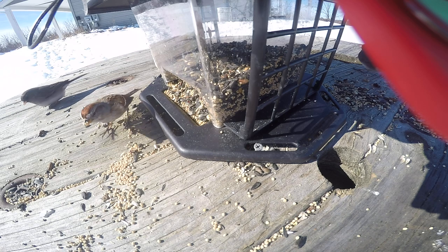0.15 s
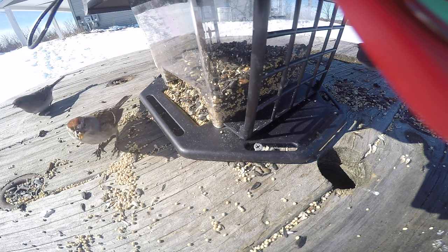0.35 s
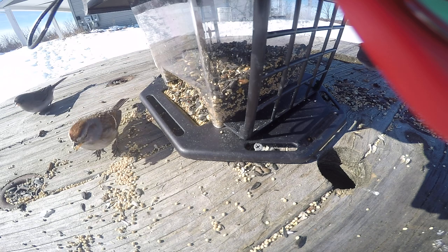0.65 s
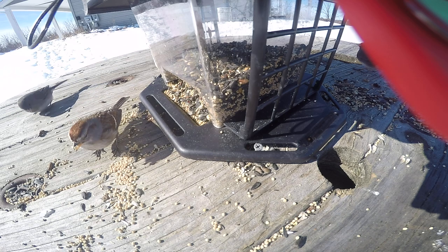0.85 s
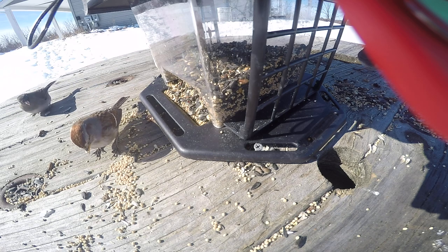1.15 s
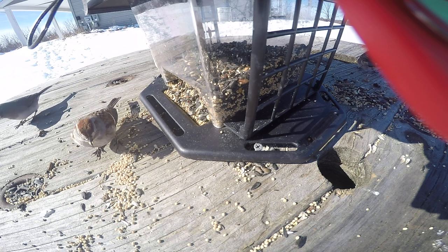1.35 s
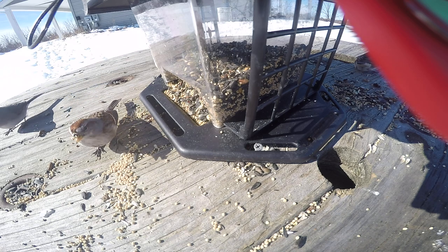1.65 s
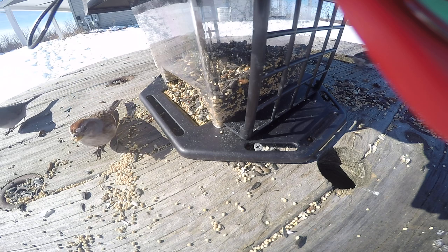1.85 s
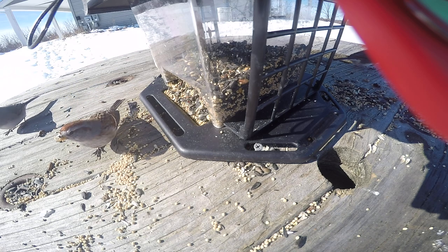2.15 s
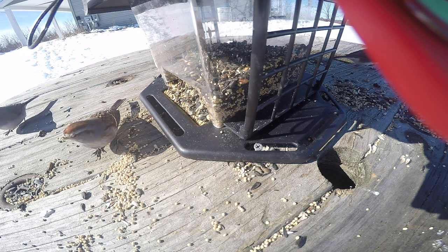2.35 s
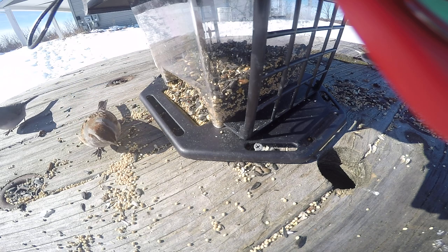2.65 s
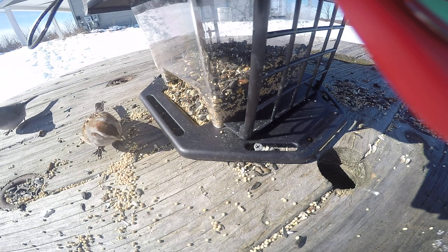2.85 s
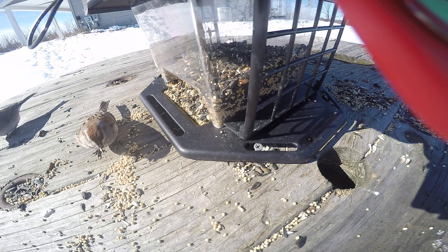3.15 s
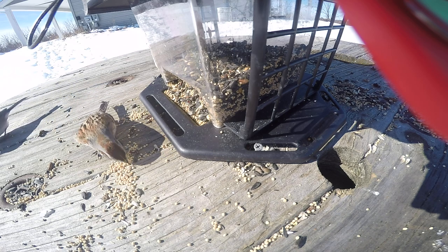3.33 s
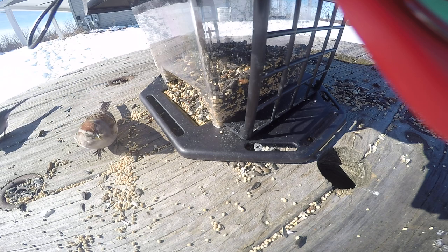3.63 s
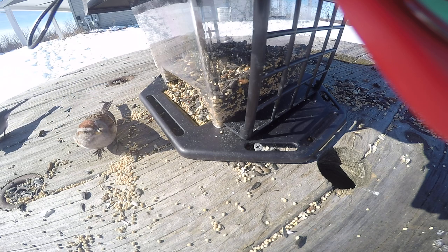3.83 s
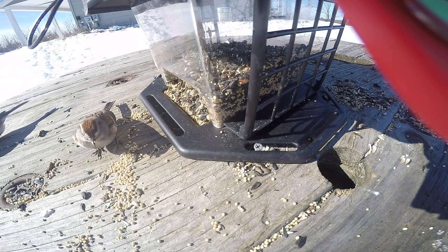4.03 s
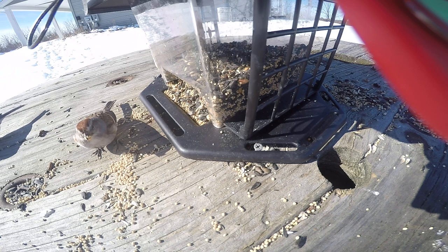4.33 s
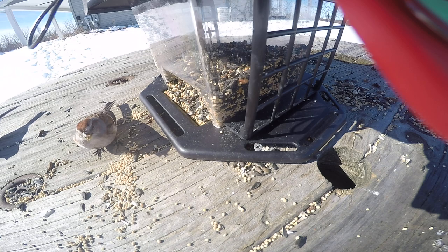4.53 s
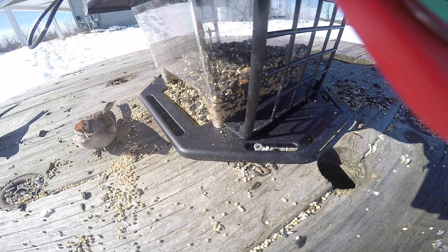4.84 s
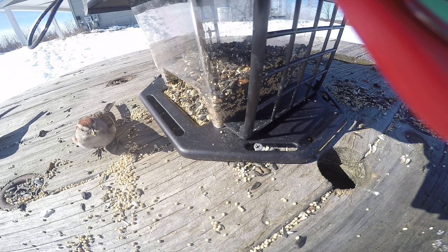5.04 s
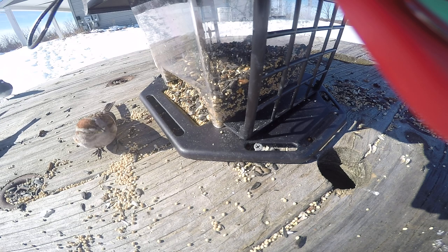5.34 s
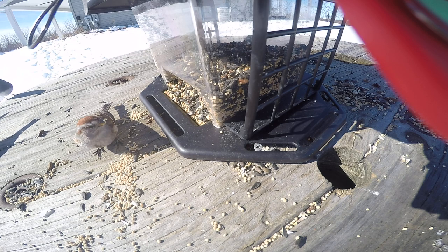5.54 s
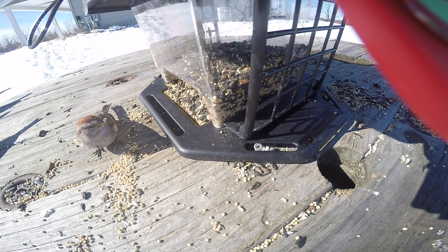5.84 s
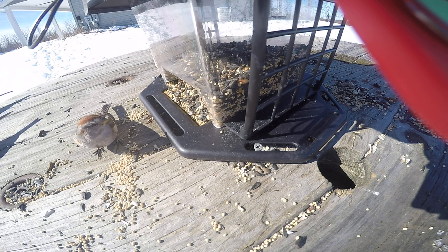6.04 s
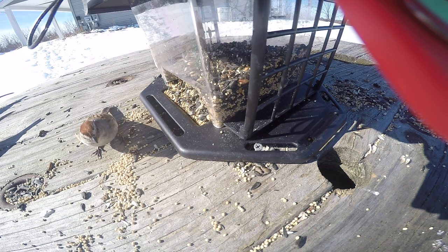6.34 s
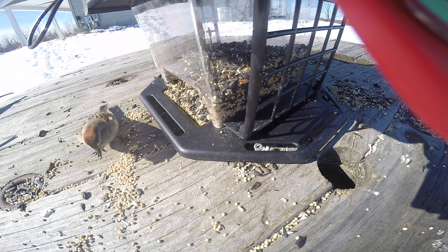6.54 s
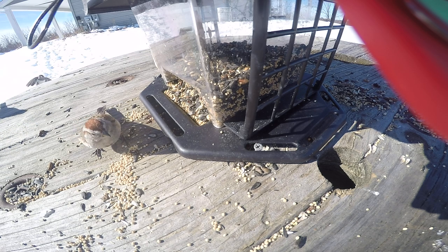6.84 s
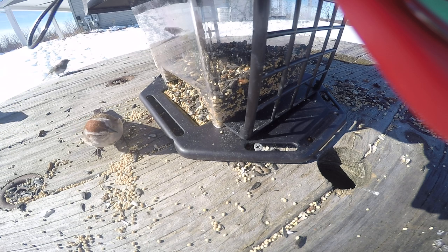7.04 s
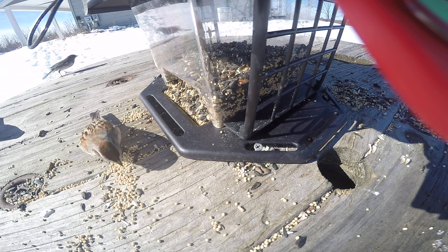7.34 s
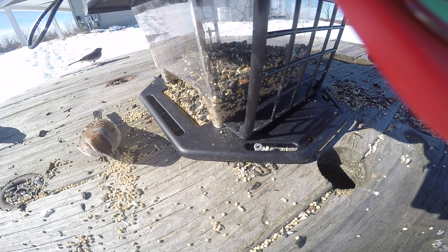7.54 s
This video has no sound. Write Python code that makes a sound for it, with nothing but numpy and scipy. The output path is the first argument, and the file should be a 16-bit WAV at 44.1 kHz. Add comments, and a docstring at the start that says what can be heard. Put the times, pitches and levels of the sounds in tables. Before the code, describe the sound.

Small birds feed on a wooden table outdoors, close to the microphone. Over a faint hiss and light wind rumble, two buzzy squabbling chirps break out, followed by a quick run of sharp, falling calls. Seed husks tick and claws scuff, then beaks and feet knock lightly on the boards. A second, softer run of calls comes at the end, along with a brief gust of wind.

```python
"""Small birds feeding on a wooden table in a snowy yard, one microphone close by.
Light wind rumbles over the recorder's hiss and faint whine; feet scuff and seed husks tick.
At 1.6 s come two buzzy squabbling chirps, then a run of sharp falling 'tew' and 'tik' calls that
echo off table and feeder. From 4.3 s beaks and feet knock on the boards; a second run of calls ends it."""
import sys
import numpy as np
from scipy import signal
from scipy.fft import rfft, irfft
from scipy.io import wavfile
from scipy.ndimage import uniform_filter1d

SR = 44100
rng = np.random.default_rng(int(sys.argv[2]) if len(sys.argv) > 2 else 0)


def generate_wav(sig):
    """Save sig (samples, or channels by samples) to the path in sys.argv[1] as 16-bit PCM at SR."""
    pcm = np.round(np.clip(np.atleast_2d(sig).T, -1, 1) * 32767).astype(np.int16)
    wavfile.write(sys.argv[1], SR, pcm)


N = 338688
TOP_HZ = 15350  # upper edge of the recorder's band


def undb(db):
    """Decibels to gain."""
    return 10 ** (np.asarray(db) / 20)


def unit(x):
    """Scale to rms 1."""
    return x / np.sqrt(np.mean(x ** 2) + 1e-30)


def clock(length):
    """Sample times of a short sound."""
    return np.arange(max(int(length * SR), 8)) / SR


def fade(t, t60):
    """Free decay by 60 dB in t60 seconds."""
    return np.exp(-np.log(1000) * t / t60)


def add(out, start, x):
    """Mix x into out from start seconds on."""
    i = int(np.clip(start * SR, 0, N - 1))
    out[i:i + len(x)] += x[:N - i]


def resonate(x, hz, width):
    """One steep-sided resonance, gain 1 at its centre."""
    hz = min(hz, .45 * SR)
    b, a = signal.iirpeak(hz, max(hz / width, .5), fs=SR)
    return signal.lfilter(b, a, signal.lfilter(b, a, x))


def coloured(points):
    """Noise of rms 1 with a spectrum of (Hz, dB) points."""
    hz, db = np.transpose(points)
    bins_hz = np.maximum(np.arange(N // 2 + 1) * SR / N, 1)
    gain = undb(np.interp(np.log(bins_hz), np.log(hz), db))
    return unit(irfft(rfft(rng.standard_normal(N)) * gain, N))


def waver(t, rate):
    """A random wander with a spread near 1, turning rate times a second."""
    steps = rng.standard_normal(int(t[-1] * rate) + 2)
    return np.interp(t * rate, np.arange(len(steps)), steps)


def hiss(hiss_db=-65, whine_hz=1948, whine_db=-72):
    """The recorder's steady hiss, with a thin electronic whine in it."""
    # The broad hiss. Each row: frequency in Hz, relative level in dB.
    spectrum = [(88, -26), (150, -2.5), (470, -10), (548, -10), (593, -10.5), (907, -12), (1210, -12),
                (1500, -15), (1860, -10), (1970, -8), (2170, -16), (2430, -12), (7920, -21), (13900, -26),
                (15300, -29.5)]
    # Narrow bands in the hiss. Each row: centre in Hz, width in Hz, level in dB.
    narrow_bands = [(1157, 246, -78.5), (1979, 210, -79), (9560, 290, -84), (13760, 1900, -81.5)]
    bands = sum(undb(db) * unit(resonate(rng.standard_normal(N), hz, width))
                for hz, width, db in narrow_bands)
    drift_hz = 2.5 * waver(np.arange(N) / SR, 12)
    whine = unit(np.sin(2 * np.pi * np.cumsum(whine_hz + drift_hz) / SR))
    return undb(hiss_db) * coloured(spectrum) + bands + undb(whine_db) * whine


def wind(breeze_sway_db=-61, breeze_rumble_db=-66):
    """Large eddies sway the microphone's diaphragm, small ones rumble; gusts swell over an even breeze."""
    # Spectra of the sway and the rumble. Each row: frequency in Hz, relative level in dB.
    sway = [(5, -13.5), (15, 0.5), (30, -3), (45, -3), (58, -22.5), (120, -65)]
    rumble = [(30, -29), (58, 3), (98, -3.5), (125, -11.5), (180, -19.5), (400, -42), (900, -90)]
    # Gusts. Each row: time of the peak in seconds, rise in seconds, sway in dB, rumble in dB.
    gusts = [(.45, 0.22, -54.5, -66), (1.01, 0.21, -61, -63), (1.39, 0.12, -52, -60),
             (1.81, 0.098, -53, -53), (4.488, 0.18, -50, -58.5), (6.00, 0.19, -56, -66.5),
             (6.824, .06, -42.5, -38)]
    peaks, rises, sway_db, rumble_db = np.transpose(gusts)
    t, out = np.arange(N) / SR, 0
    # linger is dying time over rise time: large eddies last longest
    for spectrum, breeze_db, gust_db, linger in ((sway, breeze_sway_db, sway_db, 2.03),
                                                 (rumble, breeze_rumble_db, rumble_db, .98)):
        power = undb(breeze_db) ** 2
        for peak, rise, db in zip(peaks, rises, gust_db):
            width = np.where(t < peak, rise, rise * linger)
            power = power + undb(db) ** 2 * np.exp(-2 * ((t - peak) / width) ** 2)
        eddies = coloured(spectrum)
        out = out + eddies * np.sqrt(power / uniform_filter1d(eddies ** 2, size=4500))
    return out


def scuffs(catch_spread_db=4.5):
    """Claws and beaks drag over wood and seed in a dense run of uneven catches."""
    # Each row: start in seconds, length in seconds, level in dB.
    drags = [(0.266, 0.053, -69), (1.488, 0.076, -65.5), (4.372, 0.022, -68), (4.408, 0.038, -59),
             (4.632, 0.039, -49.5), (4.692, 0.019, -62.5), (5.641, 0.033, -65), (5.886, 0.052, -63),
             (5.945, 0.03, -65), (6.722, 0.019, -58)]
    # Resonances of a scuff. Each row: centre in Hz, width in Hz, gain in dB.
    resonances = [(2618, 743, 2.5), (3240, 630, -2), (4490, 620, -14), (7000, 2400, -20.5)]
    out = np.zeros(N)
    for start, length, db in drags:
        n = len(clock(length))
        catches = rng.standard_normal(n) * undb(catch_spread_db * np.minimum(rng.exponential(size=n), 4))
        catches = np.pad(catches * signal.windows.tukey(n, .5), (0, n))
        scrape = sum(undb(gain_db) * resonate(catches, hz, width) for hz, width, gain_db in resonances)
        add(out, start, undb(db) * unit(scrape) / np.sqrt(2))
    return out


def nibbles(count=10, slot_s=.58, db=-53.5, centre_hz=4300, width_hz=2300):
    """Faint nibbling: rows for ticks(), one at a chance moment in each slot."""
    return [((k + when) * slot_s, db, centre_hz * 2 ** (pitch - .5), width_hz)
            for k, (when, pitch) in enumerate(rng.random((count, 2)))]


def ticks(ring_cycles=46, snap_db=-15.5, snap_hz=7400, snap_width_hz=5600):
    """A husk snaps brightly and rings briefly; small, high ones die soonest."""
    # Seeds cracked or flicked. Each row: start in seconds, ring's peak in dB, pitch in Hz, width in Hz.
    husks = [(1.787, -44, 1830, 900), (1.788, -50, 8600, 2500), (1.8166, -36, 1730, 1800),
             (1.828, -44.5, 3600, 3000), (2.092, -45, 2900, 3900), (3.5033, -38, 4600, 3120),
             (3.583, -53, 10150, 1000), (4.228, -47, 2790, 250), (4.572, -46, 3770, 3000),
             (5.804, -47.5, 5950, 12000), (5.991, -47, 9000, 7000), (6.779, -48, 2402, 3000),
             (7.306, -45.5, 5160, 1500)]
    out, t = np.zeros(N), clock(.05)
    for start, db, hz, width in husks + nibbles():
        burst = rng.standard_normal(len(t)) * fade(t, ring_cycles / hz)
        ring = resonate(burst, hz, width)
        snap = resonate(burst, snap_hz, snap_width_hz)
        tick = ring / np.abs(ring).max() + undb(snap_db) * snap / np.abs(snap).max()
        add(out, start, undb(db) * tick)
    return out


def chirp(gesture, gain_db, buzz_hz, swing=.025, depth=.75, octave_db=-15, rasp=.055, air_db=-14):
    """A gliding whistle, chopped and shaken by a fast flutter of the membranes, with a rasp of air."""
    # The air in a chirp. Each row: frequency in Hz, relative level in dB.
    air_spectrum = [(1200, -47), (2300, 4), (5500, 1), (7800, 2), (8900, -21), (10500, -6), (15000, -27)]
    times, *columns = np.transpose(gesture)
    t = clock(times[-1] - times[0])
    hz, db, buzz = (np.interp(times[0] + t, times, column) for column in columns)
    flutter_hz = buzz_hz * (1 + .06 * waver(t, 300))
    flutter = np.sin(2 * np.pi * np.cumsum(flutter_hz) / SR)
    shake = buzz * (swing * flutter + rasp * waver(t, 2979))
    phase = 2 * np.pi * np.cumsum(hz * (1 + shake)) / SR
    octave = undb(octave_db) / (1 + (hz / 4200) ** 12) * np.sin(2 * phase)  # high notes are purer
    air = undb(air_db) * np.sqrt(np.abs(buzz)) * coloured(air_spectrum)[:len(t)]
    return undb(db + gain_db) * (1 + depth * buzz * flutter) * (np.sin(phase) + octave + air)


def squabble():
    """Two chirps: an arch that rings clear at its top, then one sung by both sides of the syrinx."""
    # First chirp. Each row: time in seconds, pitch in Hz, relative level in dB, buzz from 0 to 1.
    arch = [(1.595, 3000, -56, .8), (1.601, 3400, -37, .8), (1.607, 4200, -36, .9), (1.611, 3300, -33, 1),
            (1.618, 6550, -24, 0), (1.624, 7620, -24, 0), (1.630, 7750, -23.5, 0), (1.634, 4600, -31, .6),
            (1.639, 3100, -32, .5), (1.648, 2200, -56, .7)]
    # Second chirp. Each row: time in seconds, upper voice's pitch in Hz and relative level in dB,
    # the same two for the lower voice, buzz from 0 to 1.
    duet = [(1.680, 3300, -58, 2200, -70, .3), (1.685, 3550, -32.5, 2300, -62, .5),
            (1.690, 4100, -35, 2450, -51, .8), (1.695, 5000, -28, 2700, -39, .7),
            (1.712, 5350, -36, 3150, -38, 1), (1.720, 6200, -34, 5100, -38, .6),
            (1.725, 6300, -44, 3200, -38, .5), (1.731, 6000, -64, 2600, -58, .5)]
    upper = [(time, hz, db, buzz) for time, hz, db, _, _, buzz in duet]
    lower = [(time, hz, db, buzz) for time, _, _, hz, db, buzz in duet]
    out = np.zeros(N)
    add(out, arch[0][0], chirp(arch, gain_db=-2.5, buzz_hz=457, octave_db=-13))
    add(out, duet[0][0], chirp(upper, gain_db=-3.5, buzz_hz=624, swing=.026))
    add(out, duet[0][0], chirp(lower, gain_db=-3.5, buzz_hz=596))
    return out


def call(start, length, fall, sweep_db, beak_hz, overshoot, held_hz, held_db, octave_db, upper_db,
         top_hz, end_hz, rise_s=.0015, release_s=.0112, break_db=-13):
    """The syrinx snaps down from a high whistle, breaks roughly, then holds a reedy note that droops."""
    # The bird's throat. Each row: frequency in Hz, gain in dB.
    throat = [(1350, -20), (1700, 0.5), (2200, 1), (3100, 2.5), (4300, 5), (6200, 2), (7800, -0.5),
              (10000, 4), (11300, -1.5), (13500, -12)]
    # The bounce off the boards cancels one band, set by where the caller sits.
    # Each row: time in seconds, notch in Hz.
    notches = [(2.2, 4320), (3.05, 4310), (6.0, 5513), (7.6, 5100)]
    notch_hz = np.interp(start, *np.transpose(notches))
    t = clock(length)
    droop_hz = held_hz + (end_hz - held_hz) * (t / length) ** 4
    low_hz = droop_hz * (1 + overshoot * np.exp(-t / .009))
    rough = np.exp(-((t - 2 * fall) / (1.2 * fall)) ** 2)  # the break at the foot of the sweep
    wobble = 1 + .014 * waver(t, 80) + .009 * waver(t, 900) + .04 * rough * waver(t, 2500)
    hz = (low_hz + (top_hz - low_hz) * np.exp(-(t / fall) ** 1.86)) * wobble
    phase = 2 * np.pi * np.cumsum(hz) / SR
    snap = np.exp(-(t / (1.75 * fall)) ** 4)
    sweep = undb(sweep_db) * snap * np.minimum(t / rise_s, 1)
    held = undb(held_db) * (1 - snap) * np.minimum((length - t) / release_s, 1)
    near = lambda pitch_hz, centre_hz: np.exp(-(np.log(pitch_hz / centre_hz) / .2) ** 2)
    throat_db = lambda pitch_hz: np.interp(pitch_hz, *np.transpose(throat))
    # the whistle flares as it passes the resonance of the open beak, and dips in the notch
    out = sweep * undb(7 * near(hz, beak_hz) - 13 * near(hz, notch_hz) + throat_db(hz)) * np.sin(phase)
    sweep_octave = sweep * undb(-14) * (7000 / top_hz) ** 3  # a whistle that starts higher is purer
    harmonics_db = [0, octave_db, upper_db - 2, upper_db, upper_db + 1, upper_db - 2]
    for k, db in enumerate(harmonics_db, 1):
        note = held * undb(db + 1.3 * np.sqrt(k) * waver(t, 90) + .8 * waver(t, 1200))
        # a note with weak upper overtones also breaks more dully
        rasp = rough * undb(sweep_db + break_db + .12 * upper_db * np.log2(k)) * waver(t, 2036)
        colour = (k * hz < TOP_HZ) * undb(throat_db(k * hz) - 4 * near(k * hz, notch_hz))
        out += colour * (note + (k == 2) * sweep_octave + rasp) * np.sin(k * phase)
    return out


def calls():
    """Long 'tew' calls hold their low note; short 'tik' calls cut off just after the snap."""
    # Each row: start, length and fall time in seconds, sweep in dB, beak resonance in Hz, overshoot as a
    # share of pitch, held pitch in Hz, held level in dB, its octave and upper overtones in relative dB.
    tews = [(2.291, 0.048, 0.003, -42.5, 3320, .01, 1800, -50.5, 2, -34),
            (2.386, 0.06, 0.0041, -44.5, 2960, .26, 1825, -50.5, -9.5, -21),
            (2.5080, .0666, 0.0036, -43, 2890, 0.37, 1876, -50.5, -7.5, -17.5),
            (2.6263, 0.076, 0.0044, -40.5, 3380, 0.3, 1757, -49.5, -8, -19),
            (2.8697, 0.055, .0044, -44, 5700, 0.38, 1640, -45.5, -8, -20),
            (3.0238, 0.079, .0047, -43, 6450, .08, 1626, -48, -10.5, -25),
            (6.8130, 0.079, 0.0032, -48, 3270, 0.13, 1820, -63.5, -3, -5.5),
            (7.2204, .0678, .0040, -45.5, 2930, 0.25, 1769, -58.5, -11.5, -12)]
    # Each row: start and length in seconds, sweep in dB, beak resonance and top pitch in Hz,
    # held level in dB, its octave in relative dB.
    tiks = [(2.2198, 0.02, -47, 2900, 8400, -59, 8.5), (2.6627, 0.016, -44, 6640, 10000, -60, 0),
            (2.7250, 0.02, -44.5, 7000, 10240, -52, 1), (2.7948, 0.027, -45, 6700, 8700, -46.5, -6),
            (6.028, 0.012, -51.5, 9300, 10460, -66, -3), (6.6700, .0080, -46, 7800, 9770, -43, -3),
            (6.739, 0.011, -47.5, 7900, 9900, -45, 2), (7.0760, 0.01, -46.5, 4200, 9070, -57, 12),
            (7.144, .0159, -49, 3870, 9680, -65, 15), (7.5740, 0.015, -46, 4300, 9400, -54, -4)]
    out = np.zeros(N)
    for start, *shape in tews:
        add(out, start, call(start, *shape, top_hz=6920, end_hz=1435))
    for start, length, sweep_db, beak_hz, top_hz, held_db, octave_db in tiks:
        fall = .0042 * (top_hz / 9600) ** 2.2  # a higher start takes longer to fall
        tik = call(start, length, fall, sweep_db, beak_hz, overshoot=.26, held_hz=1587, held_db=held_db,
                   octave_db=octave_db, upper_db=-19, top_hz=top_hz, end_hz=1410)
        add(out, start, tik)
    return out


def contacts():
    """Beaks and feet strike the boards; a lighter, sharper touch leads some of the blows."""
    # Each row: start in seconds, thud in dB, clack in dB, the touch's lead in seconds (0 for none).
    strikes = [(4.287, -38, -46.5, 0.024), (4.393, -41, -53, 0), (4.480, -37.5, -48, 0.0053),
               (4.499, -44, -58, 0), (4.600, -39.5, -52, 0.00043), (4.640, -41, -50.5, 0.016),
               (4.724, -48.5, -54, 0), (4.809, -52.5, -60.5, 0.0021), (4.869, -33, -40.5, 0.0048),
               (5.648, -51.5, -58, 0.00035), (5.956, -54, -70, 0.065), (6.043, -43.5, -47, 0),
               (6.255, -49, -55, 0), (6.415, -42, -57.5, 0.014), (6.742, -38.5, -52, 0.03)]
    blows = [(start, thud, clack) for start, thud, clack, _ in strikes]
    touches = [(start - lead, thud - 5.5, clack + 3) for start, thud, clack, lead in strikes if lead > 0]
    return blows + touches


def knocks(push_s=.0021, crack_t60=.017, thump_t60=.093, low_modes_hz=900):
    """A blow's weight pushes the low modes of the boards; its hard tip rings the high ones and cracks."""
    # The table's modes. Each row: frequency in Hz, relative level in dB, time to fall 60 dB in seconds.
    modes = [(143.2, -10, 0.205), (194.6, -8.5, 0.15), (230.7, -3, 0.13), (292.6, -30, 0.043),
             (365, -32, 0.16), (495.3, -21.5, 0.046), (554, -20, 0.095), (735, -13.5, 0.04),
             (822, -14, 0.049), (930, -11.5, 0.086), (1183, -5.5, 0.049), (1400, 0.5, 0.033),
             (1688, 1, 0.044), (2000, -11, 0.028), (2334, 2, 0.028), (2530, -0.5, 0.058),
             (3205, 1.5, 0.021), (3610, -17, 0.0275), (4560, -4.5, 0.024)]
    out, t = np.zeros(N), clock(.3)
    push = 1 - np.exp(-t / push_s)
    for start, thud_db, clack_db in contacts():
        crack = unit(resonate(rng.standard_normal(len(t)), hz=2400, width=3200)) * fade(t, crack_t60)
        thump = unit(resonate(rng.standard_normal(len(t)), hz=190, width=175)) * fade(t, thump_t60)
        knock = undb(clack_db - 7) * crack + undb(thud_db - 9) * push * thump
        for hz, db, t60 in modes:
            spot, detune, side = rng.standard_normal(3)
            if hz < low_modes_hz:
                drive = undb(thud_db) * push
            else:  # the high modes depend on where the blow lands
                drive = np.sign(side) * undb(clack_db - 8 + 2 * spot)
            knock += drive * undb(db) * fade(t, t60) * np.sin(2 * np.pi * hz * (1 + .015 * detune) * t)
        add(out, start, knock)
    return out


def surroundings(x, scatter_db=-19, scatter_t60=.043, yard_db=-42, yard_t60=.37):
    """A few close echoes, scatter from the feeder's cage, and a trace of the snowy yard."""
    # Echoes off the boards and the feeder. Each row: delay in seconds, gain in dB.
    echoes = [(.0019, -23), (.0031, -12.5), (.0052, -20.5)]
    t = clock(.4)
    tail = lambda t60: unit(rng.standard_normal(len(t)) * fade(t, t60) * (t > .002)) / np.sqrt(len(t))
    response = undb(scatter_db) * tail(scatter_t60) + undb(yard_db) * tail(yard_t60)
    response[0] += 1  # the direct sound
    for delay, db in echoes:
        response[int(delay * SR)] += undb(db)
    return signal.fftconvolve(x, response)[:N]


def scene():
    """Birds and their feeding, close up and in mono, over wind and hiss."""
    birds = calls() + squabble() + ticks() + scuffs()
    return (surroundings(birds) + knocks() + wind() + hiss())[None]


def record(dry):
    """The recorder cuts the top treble steeply."""
    return signal.sosfilt(signal.ellip(10, .2, 70, TOP_HZ, fs=SR, output="sos"), dry)


dry = scene()
out = record(dry)
generate_wav(out)
```